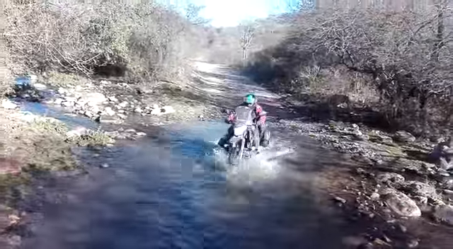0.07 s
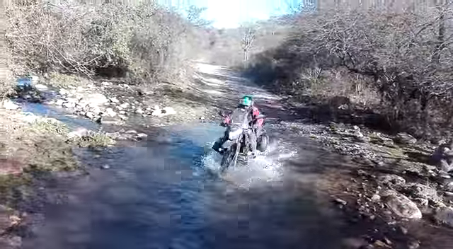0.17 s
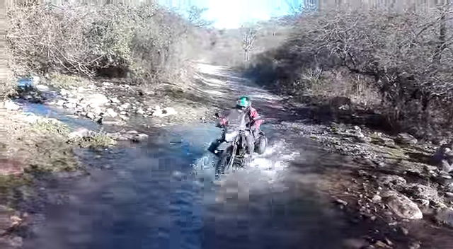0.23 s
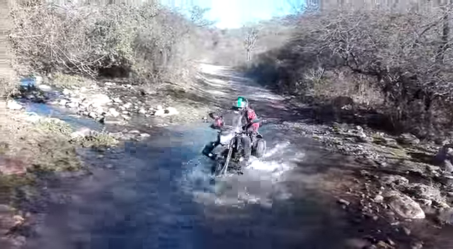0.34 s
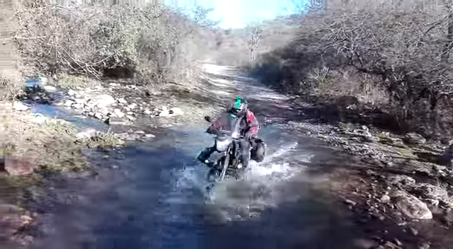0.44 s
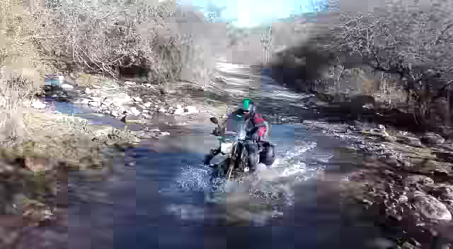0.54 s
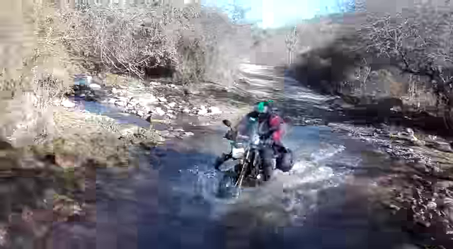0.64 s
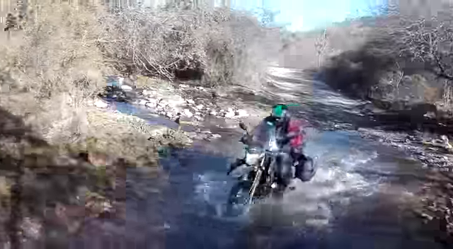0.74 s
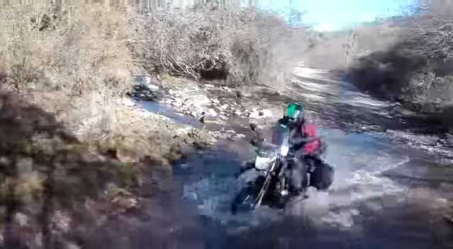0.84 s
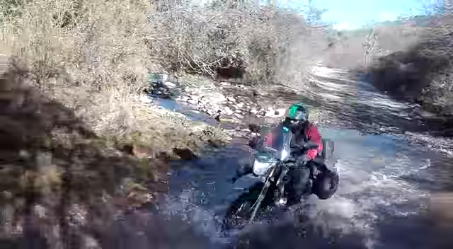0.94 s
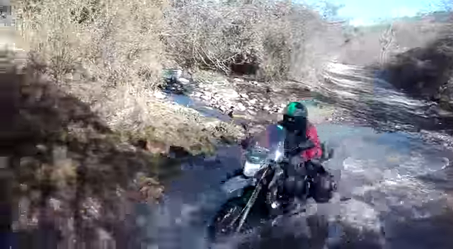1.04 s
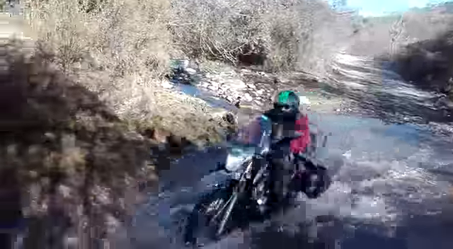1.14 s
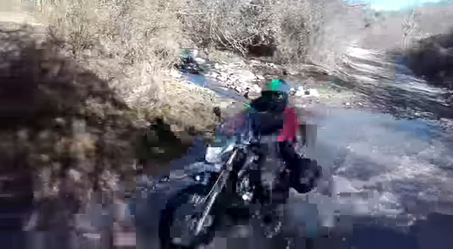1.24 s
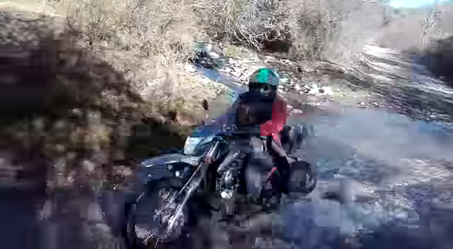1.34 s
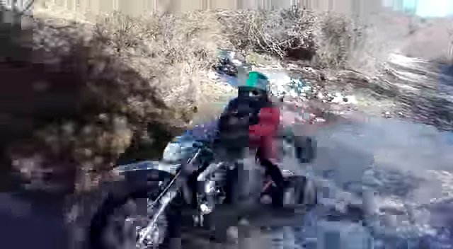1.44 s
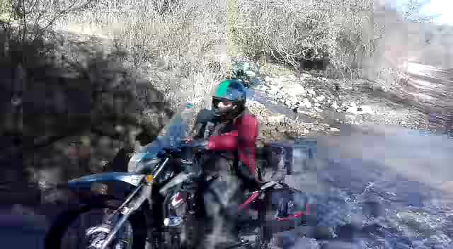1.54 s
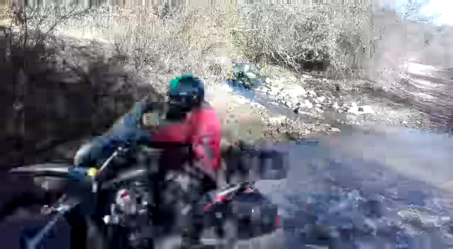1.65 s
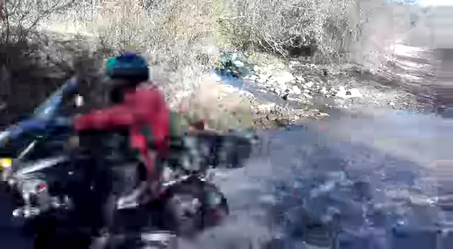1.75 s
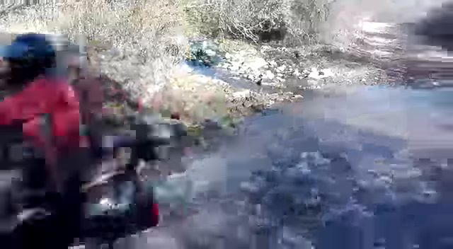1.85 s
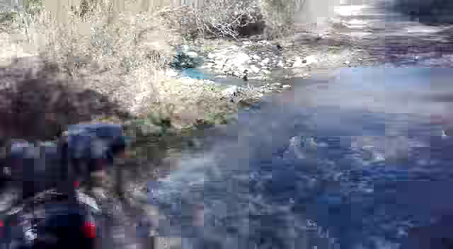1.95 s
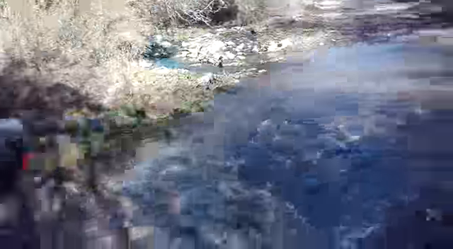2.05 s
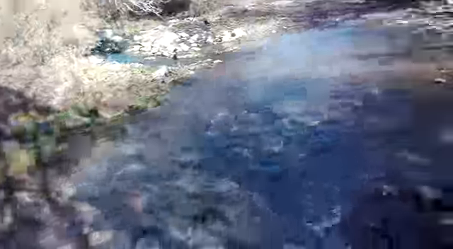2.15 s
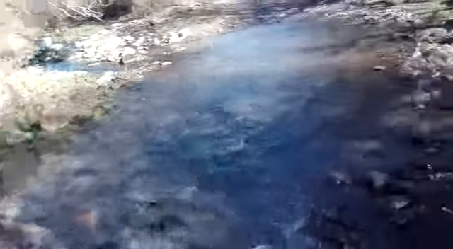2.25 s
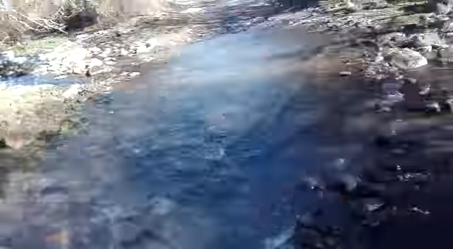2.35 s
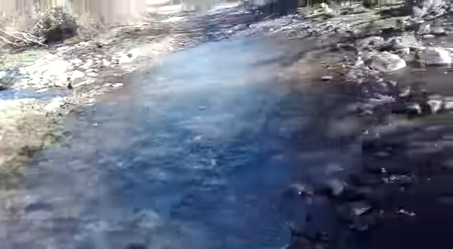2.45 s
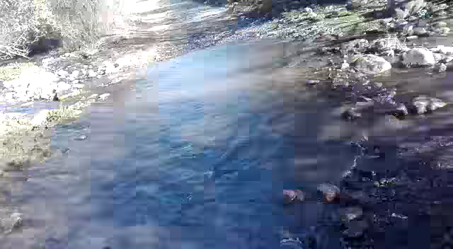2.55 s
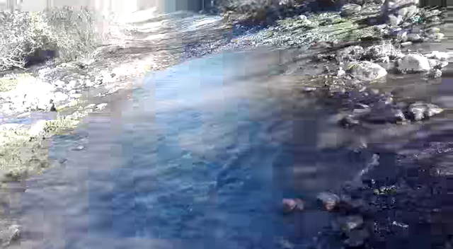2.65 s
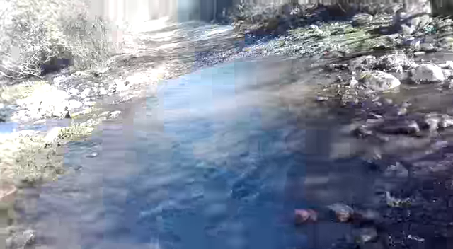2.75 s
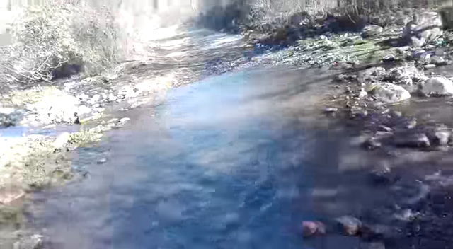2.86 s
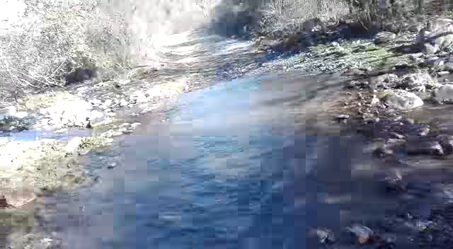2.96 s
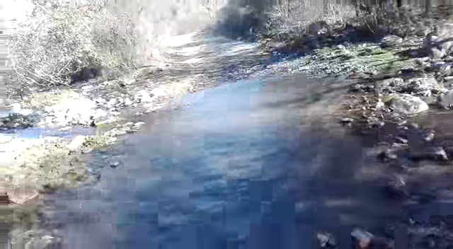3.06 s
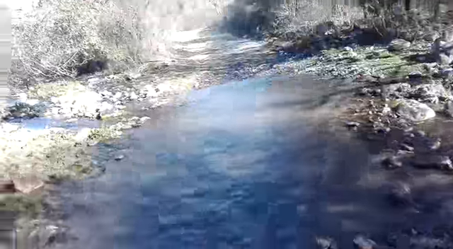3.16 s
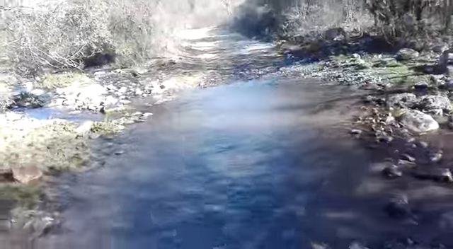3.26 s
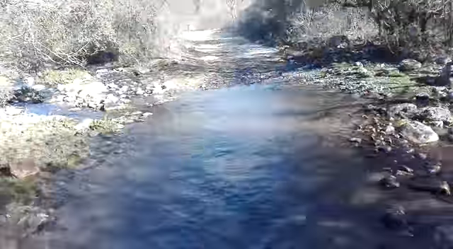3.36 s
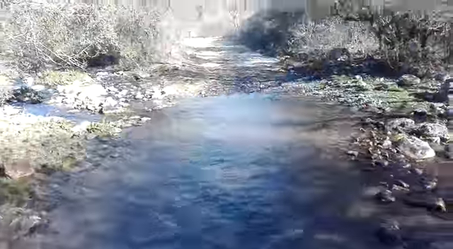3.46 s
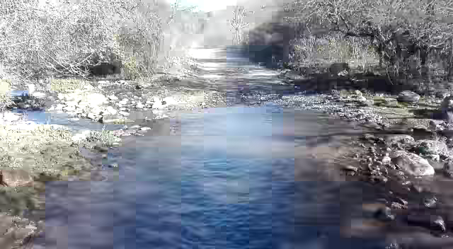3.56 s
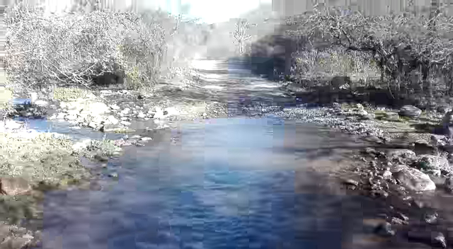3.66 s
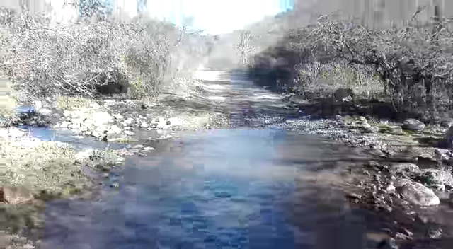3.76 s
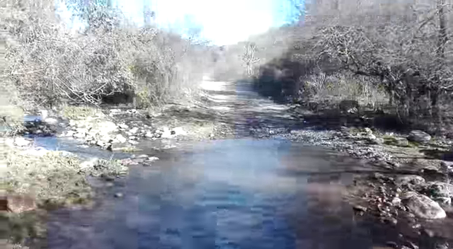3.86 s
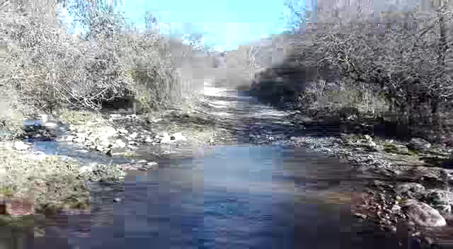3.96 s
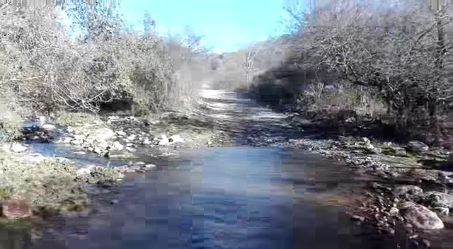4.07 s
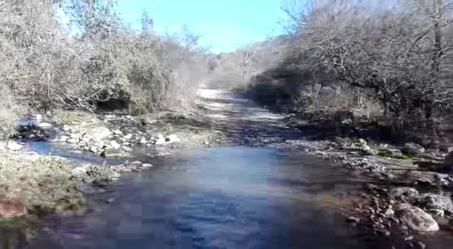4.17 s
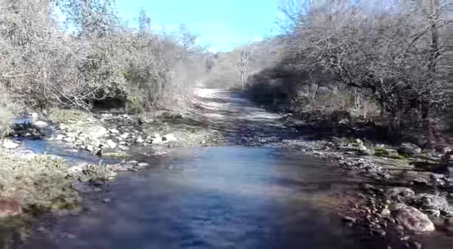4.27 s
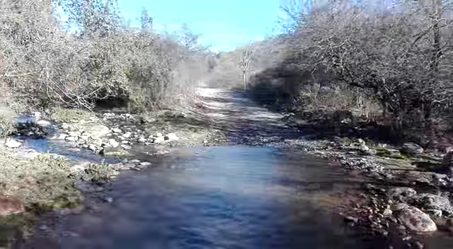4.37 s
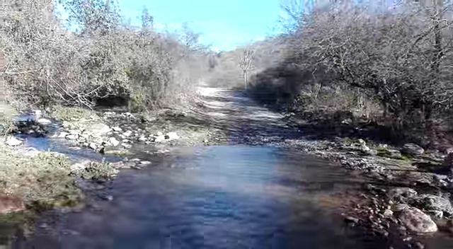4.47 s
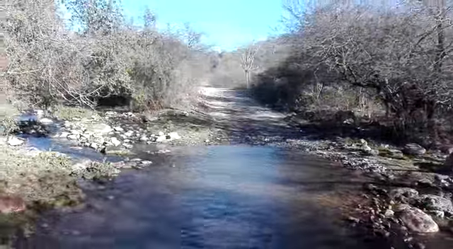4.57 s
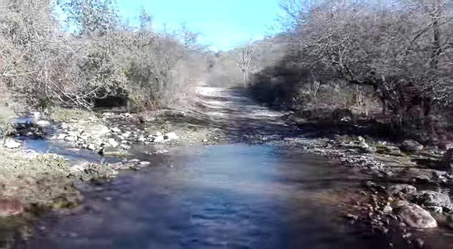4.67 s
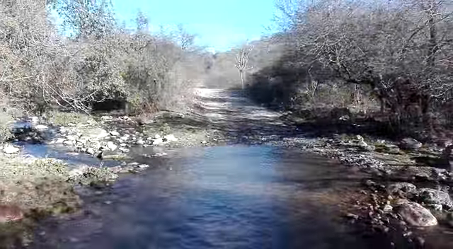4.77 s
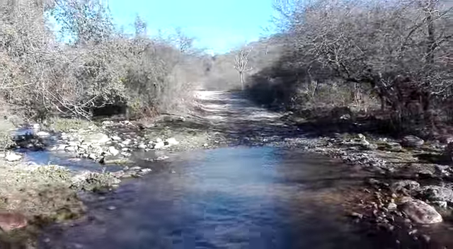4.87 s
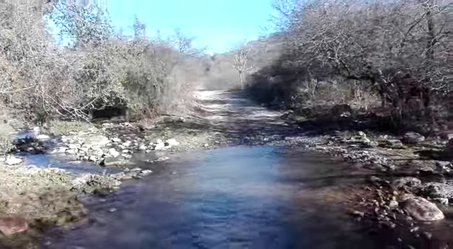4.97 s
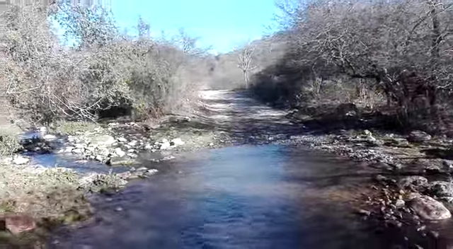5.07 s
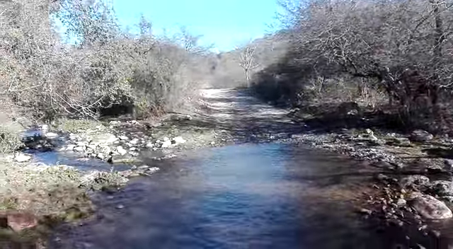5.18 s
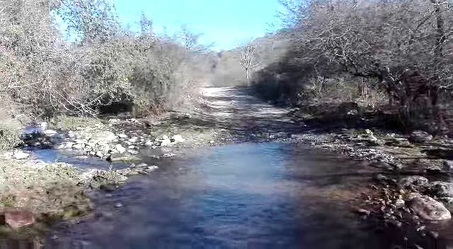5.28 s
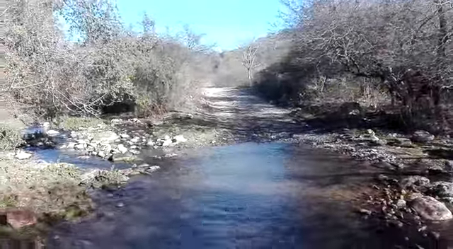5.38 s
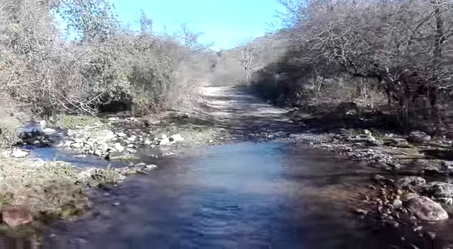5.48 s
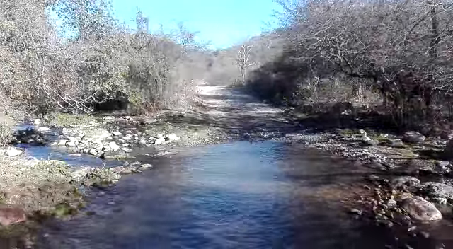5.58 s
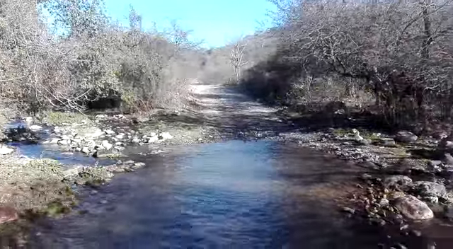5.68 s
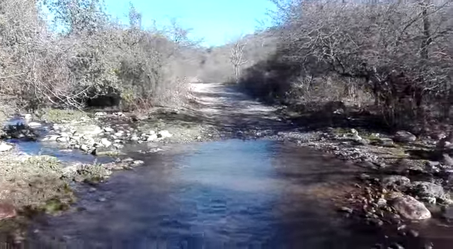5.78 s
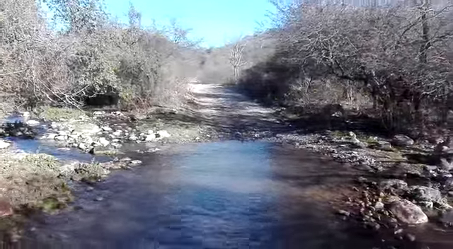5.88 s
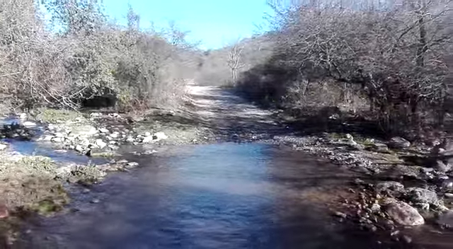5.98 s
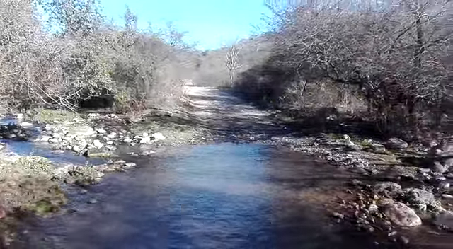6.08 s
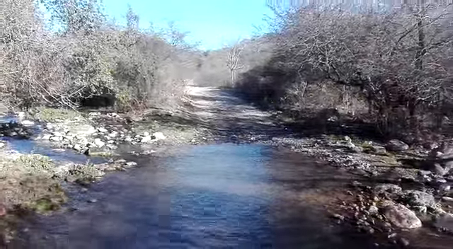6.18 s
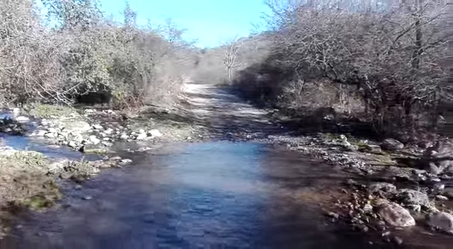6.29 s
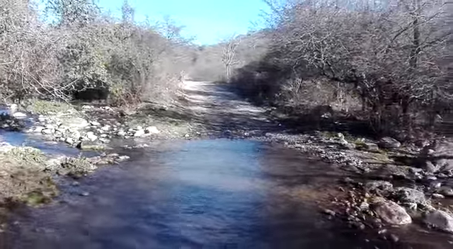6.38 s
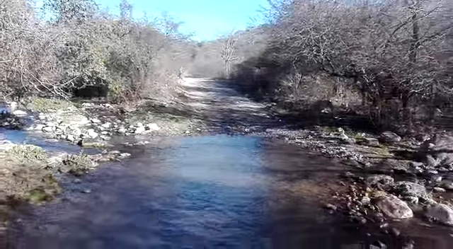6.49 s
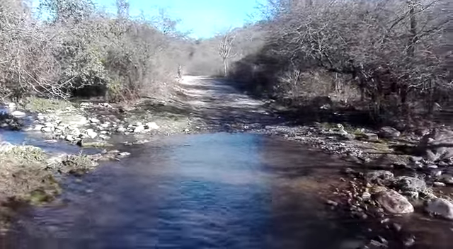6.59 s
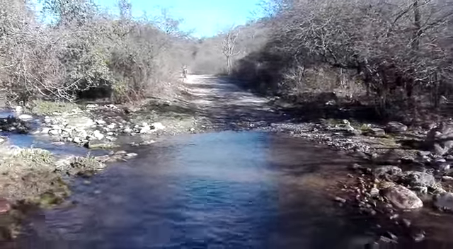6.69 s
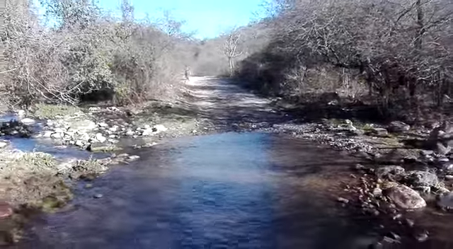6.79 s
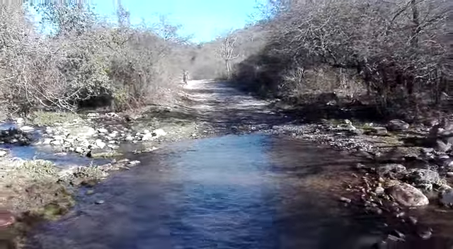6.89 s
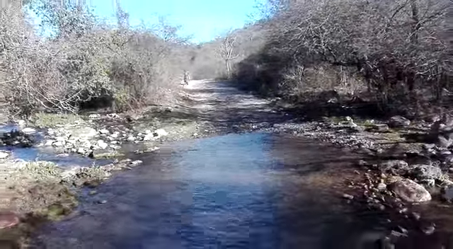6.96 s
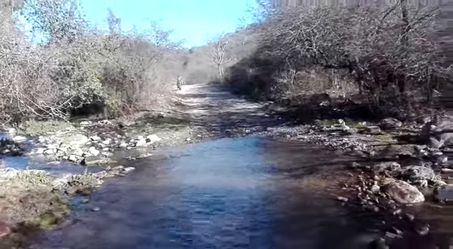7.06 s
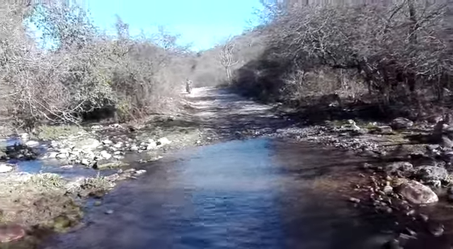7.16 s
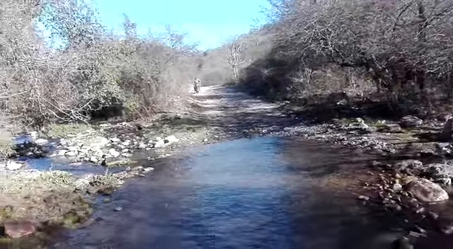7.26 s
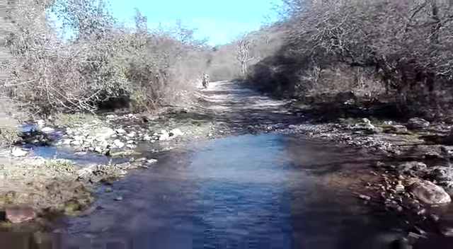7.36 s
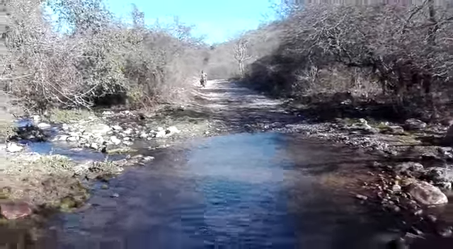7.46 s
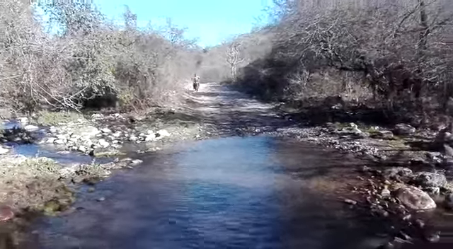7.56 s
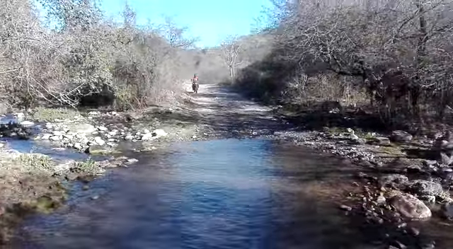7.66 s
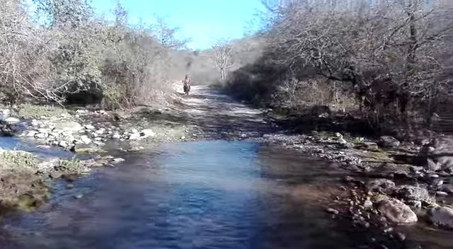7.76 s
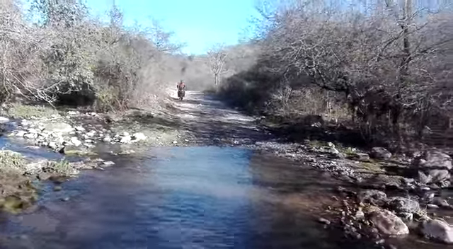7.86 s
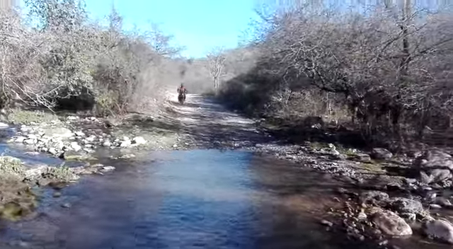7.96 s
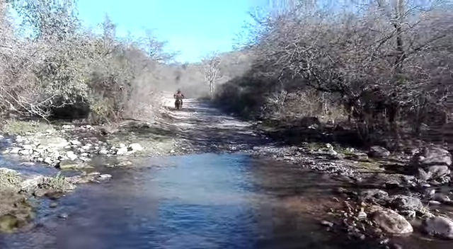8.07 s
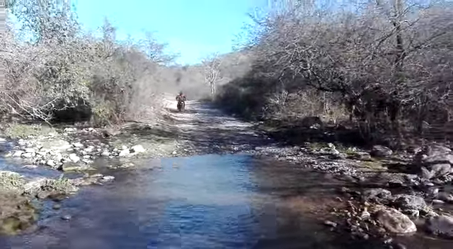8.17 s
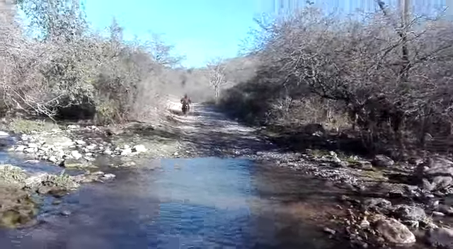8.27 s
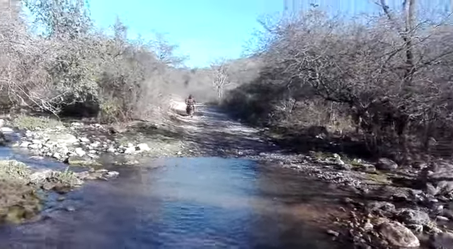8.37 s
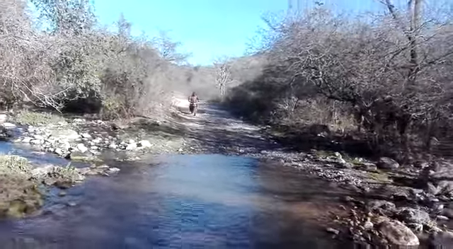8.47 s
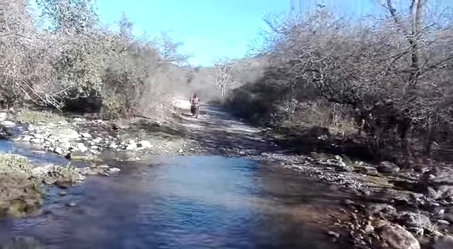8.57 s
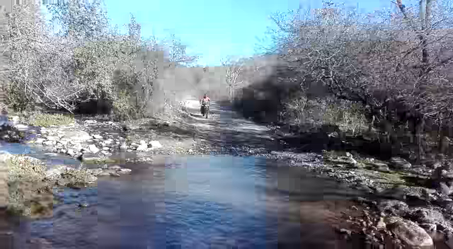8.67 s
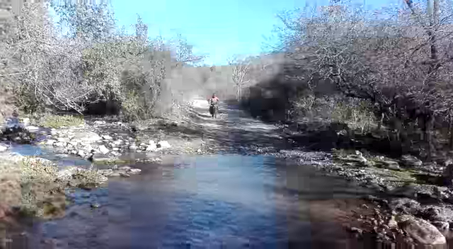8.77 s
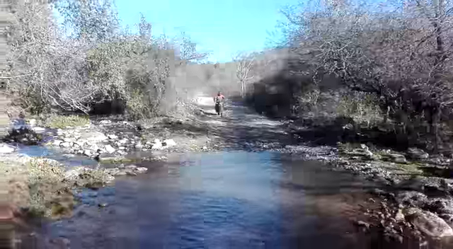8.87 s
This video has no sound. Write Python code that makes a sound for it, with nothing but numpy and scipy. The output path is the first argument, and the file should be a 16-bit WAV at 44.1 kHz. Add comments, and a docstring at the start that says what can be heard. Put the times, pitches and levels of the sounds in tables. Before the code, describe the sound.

At a shallow ford outdoors, heard close to the water, a bike that has just crossed thumps loudly and dully, falling to a slow idle by about 2.4 seconds. A single drip sounds near 0.1. Meanwhile a second single-cylinder bike approaches, its spray growing to a wide hissing burst around 1.6 as it revs and passes. Spray drops sharply after 2, and the raspy, barking exhaust dips and surges from 2.1 to 4.2, climbing the bank with a blurred tail from the trees. At about 4.2 the throttle closes; revs fall and irregular pops and small dry ticks continue to about 6.2, receding. From then on, soft uneven idling with missed beats sits over very faint stream water. After 6.5 a thin rasp of a third bike comes from far away, with tiny very high chirps from 7 to 8.5.

```python
"""Two single-cylinder trail bikes at a shallow ford, near the listener, over a trickling stream and one early drip.
One has crossed and slows to an uneven idle; the next ploughs through in a burst of spray, passes,
climbs the bank under throttle and draws off popping, while ticks begin. Late on, a third runs far up the track
and something small chirps very high. Each pipe is a set of decaying modes rung by every firing;
rasp, spray, stream and the blur from the banks are shaped noise."""
import sys
import numpy as np
from scipy import signal
from scipy.fft import rfft, irfft, next_fast_len
from scipy.io import wavfile
from scipy.ndimage import uniform_filter1d

SR = 44100
rng = np.random.default_rng(int(sys.argv[2]) if len(sys.argv) > 2 else 0)


def materialize(psi):
    """Save the field psi as 16-bit PCM at rate SR to the path in sys.argv[1].

    A 1-D psi becomes a single channel; in a 2-D psi each row is a channel.
    """
    bounded = np.clip(np.atleast_2d(psi).T, -1, 1)
    quanta = np.round(bounded * 32767).astype(np.int16)
    wavfile.write(sys.argv[1], SR, quanta)


N = 393813


def amp(db):
    """Decibel law: the amplitude gain of a level in dB."""
    return 10 ** (np.asarray(db) / 20)


def unit(x):
    """Normalisation: x at rms 1."""
    return x / np.sqrt(np.mean(x ** 2) + 1e-20)


def read(rows, s):
    """Linear interpolation: each column after the first, read at the times s."""
    t, *cols = np.transpose(rows)
    return [np.interp(s, t, c) for c in cols]


def along(points, hz):
    """Logarithmic pitch scale: (Hz, value) points interpolated on a log axis."""
    f, v = np.transpose(points)
    return np.interp(np.log(hz + 1), np.log(f + 1), v)


def filtered(x, response):
    """Linear filtering: the spectrum of x times a response of frequency."""
    padded = next_fast_len(N + 8192)
    spectrum = rfft(x, padded) * response(np.fft.rfftfreq(padded, 1 / SR))
    return irfft(spectrum, padded)[..., :N]


# Stereo spread of all noise: pitch_hz [Hz], side_minus_mid_db [dB]
SIDE_SPREAD = [(3500, -92.5), (4500, -30), (6000, -10), (8000, -4.5), (14000, -4)]


def rush(tone, patchy_db, drops=0, drop_db=0):
    """Turbulence: coloured noise of mid rms 1, with random patches and droplet clicks (drops per s)."""
    drop_sizes = (rng.random(N) < drops / SR) * rng.exponential(size=N)
    clicks = uniform_filter1d(drop_sizes, size=40) * 40  # each lasts 40 samples
    white = rng.standard_normal((2, N)) * (1 + amp(drop_db) * clicks)
    z = signal.stft(white, nperseg=512)[2]
    field = uniform_filter1d(rng.standard_normal(z.shape[1:]), size=8, axis=0)  # over frequency
    field = uniform_filter1d(field, size=10, axis=1)  # over time
    pair = signal.istft(z * amp(patchy_db * unit(field)), nperseg=512)[1][:, :N]
    # only the treble differs between the ears
    mid, side = filtered(pair, lambda hz: amp(along(tone, hz) + [0 * hz, along(SIDE_SPREAD, hz)]))
    return np.array([mid + side, mid - side]) / np.std(mid)


def firings(rate, lead):
    """Phase accumulation: times at which the summed rate passes a whole number, less lead (s)."""
    steps = 2000  # per s
    t = np.arange(rate[0][0], rate[-1][0], 1 / steps)
    turns = np.cumsum(read(rate, t)[0]) / steps
    return np.interp(np.arange(int(turns[-1]) + 1), turns, t) - lead


def laid(s, rows):
    """Superposition: one row of samples added at each time."""
    at = np.round(s * SR).astype(int)[:, None] + np.arange(rows.shape[1])
    # a margin of 1 s before and 2 s after takes the overhang
    return np.bincount(at.ravel() + SR, rows.ravel(), N + 3 * SR)[SR:SR + N]


# How unlike one firing is to the next: time_s [s], roughness [0-1]
FIRING_ROUGHNESS = [(0, .6), (1.2, .6), (1.5, .55), (2.05, .45), (2.15, .3), (2.45, .35), (2.6, .3),
                    (4.1, .28), (4.4, .4), (4.65, .9), (8.93, .9)]


def rung(s, db, modes, scatter_db, stretch=1):
    """Modal resonance: each firing pulls the air in first and rings the modes at new strengths and pitches."""
    t = np.arange(SR // 12) / SR
    rough, = read(FIRING_ROUGHNESS, s)
    rows = 0
    for hz, level_db, t60, attack in modes:
        chance = rough[:, None] * np.clip(rng.standard_normal((len(s), 2)), -1.5, 1.5)
        pitch = hz * stretch * (1 + .012 * chance[:, 0])
        strength = amp(db + scatter_db * chance[:, 1])
        fade = amp(level_db - 60 * t / t60) * (1 - np.exp(-t / attack))
        # the minus sign makes the first swing a pull
        rows = rows - strength[:, None] * fade * np.sin(2 * np.pi * pitch[:, None] * t)
    return laid(s, rows)


def marked(s, times, values):
    """Nearest-neighbour assignment: the values at the firings nearest to the times, 0 elsewhere."""
    out = np.zeros(len(s))
    out[np.abs(s[:, None] - np.asarray(times)).argmin(axis=0)] = values
    return out


# Echo from the banks as the bike draws off: time_s [s], level_under_direct_db [dB]
BANK_ECHO = [(0, -34), (2.4, -9.5), (4.1, -20), (4.5, -15), (8.93, -1)]


def scattered(x):
    """Diffuse reflection: the banks return the upper part of x as a short blurred tail."""
    decay_t60_s, lowest_hz = 0.39, 300
    t = np.arange(SR // 4) / SR
    tail = rng.standard_normal(len(t)) * amp(-60 * t / decay_t60_s) * (1 - np.exp(-t / 0.026))
    tail = tail / np.linalg.norm(tail)
    upper = filtered(x, lambda hz: hz ** 4 / (hz ** 4 + lowest_hz ** 4))
    level_db = read(BANK_ECHO, np.arange(N) / SR)[0]
    return amp(level_db) * signal.fftconvolve(upper, tail[None], axes=1)[:, :N]


# Level of the third bike: time_s [s], level_db [dB]
FAR_LEVEL = [(6, -79), (6.5, -65), (7.2, -59.5), (7.6, -77), (7.78, -57), (8.1, -62), (8.5, -62),
             (8.93, -70)]
# Its spectrum: pitch_hz [Hz], density_db [dB per Hz]
FAR_SPECTRUM = [(900, -40), (1300, 1), (1480, 2.5), (1800, -11), (2300, -23), (2750, -5), (3100, -2),
                (3500, -16), (5000, -45)]


def far_bike():
    """Band-limited noise: only two thin bands of rasp reach the ford from far up the track."""
    level_db = read(FAR_LEVEL, np.arange(N) / SR)[0]
    return amp(level_db) * rush(FAR_SPECTRUM, patchy_db=2.0, drops=60, drop_db=-6)


# Spectrum of the low blur: pitch_hz [Hz], density_db [dB per Hz]
RUMBLE_SPECTRUM = [(12, -70), (25, -40), (54, -9), (75, 0), (110, -2), (150, -8), (200, -17), (300, -23),
                   (372, -40), (650, -56), (1100, -120)]


def banks():
    """Diffuse reflection: the banks return a low blur of the engines, thinner under load and in even running."""
    lag_s, loaded_db, gain_db, floor_db = 0.25, -9, -7, -41
    t = np.arange(N) / SR
    level_db, load, _ = read(THROTTLE, t - lag_s)
    thump_db = read(WAITING_PIPE, t - lag_s)[0]
    passing = read(FIRING_ROUGHNESS, t)[0] * amp(level_db + loaded_db * load)
    engines = passing + amp(thump_db - 12)
    return (amp(gain_db) * engines + amp(floor_db)) * rush(RUMBLE_SPECTRUM, patchy_db=-0.5)


# Levels of the wheel spray, before its surges, and of the stream: time_s [s], level_db [dB]
SPRAY_LEVEL = [(0.0, -40.5), (0.5, -33.5), (0.98, -31), (1.3, -27), (1.42, -26), (1.52, -24.5),
               (1.64, -23.5), (1.78, -24), (1.9, -26), (2.06, -37), (2.36, -40), (2.8, -43.5), (3.2, -57),
               (4.1, -53), (4.6, -86), (5.3, -75)]
STREAM_LEVEL = [(0, -35.5), (1, -33.5), (1.45, -28.5), (1.65, -23.5), (1.85, -28), (2.2, -27), (2.5, -37.5),
                (3.2, -41), (4.05, -42), (4.65, -52), (5.2, -54), (7.1, -53.5), (7.6, -54), (7.8, -52),
                (8.4, -53), (8.93, -54)]
# Their spectra: pitch_hz [Hz], density_db [dB per Hz]
SPRAY_SPECTRUM = [(180, -27), (300, -12), (358, 7), (442, -31), (685, -23), (947, -21), (1370, -10.5),
                  (1670, -5.5), (2420, -8.5), (3240, -4), (6300, -13.5), (13000, -8.5), (14400, -15.5)]
STREAM_SPECTRUM = [(300, -41), (420, -4), (591, -8), (774, -6), (954, -7), (1790, -6.5), (2380, -12),
                   (3120, -11), (4080, -14), (8260, -23.5), (12800, -20.5), (14400, -23.5)]


def water():
    """Turbulent noise with droplet impacts: wheel spray over the churn and trickle of the ford."""
    surge_rms_db, surge_s = 1, 0.03
    t = np.arange(N) / SR
    span = int(surge_s * SR)
    surge = uniform_filter1d(uniform_filter1d(rng.standard_normal(N), span), span)
    spray_db = read(SPRAY_LEVEL, t)[0] + surge_rms_db * unit(surge)
    spray = amp(spray_db) * rush(SPRAY_SPECTRUM, patchy_db=2, drops=500, drop_db=-9)
    stream = amp(read(STREAM_LEVEL, t)[0]) * rush(STREAM_SPECTRUM, patchy_db=1.8, drops=160, drop_db=-9)
    return spray + stream


# Broad ticks: start_s [s], envelope_peak_db [dB], before the treble filter
TICK_EVENTS = [(4.537, -43), (4.596, -32.5), (4.614, -39.5), (4.898, -43), (5.584, -37), (5.6115, -42),
               (6.0202, -44), (6.5859, -46), (6.977, -44), (7.7136, -44)]
# High chirps, and the drip: start_s [s], level_db [dB], pitch_hz [Hz] at the start, t60_s [s]
CHIRP_EVENTS = [(7.046, -55, 7000, 0.11), (7.847, -46, 12300, 0.21), (8.143, -54, 12200, 0.13),
                (8.17, -54, 6800, 0.11), (8.262, -53, 8900, 0.17), (8.44, -46, 12200, .2)]
DRIP_EVENT = [(.134, -14.5, 1940, 0.022)]


def small_sounds():
    """Exponential decay: noise ticks, and fluttering sine tones for the breathy chirps and one drip."""
    tick_t60_s, tick_hz = 0.082, 1300  # ticks are thin below tick_hz
    t = np.arange(SR // 6) / SR
    s, db = np.transpose(TICK_EVENTS)
    ticks = laid(s, amp(db[:, None] - 60 * t / tick_t60_s)) * rush(RASP_SPECTRUM, patchy_db=1.5)
    ticks = filtered(ticks, lambda hz: hz ** 2 / (hz ** 2 + tick_hz ** 2))
    s, db, hz, t60 = np.transpose(CHIRP_EVENTS + DRIP_EVENT)[:, :, None]
    # the pitch sags a little and flutters at random
    flutter = unit(uniform_filter1d(rng.standard_normal((len(s), len(t))), size=30, axis=1))
    pitch = hz * (1 + 0.016 * flutter - .3 * t)
    fade = amp(db - 60 * t / t60) * (1 - np.exp(-t / 0.001))
    tones = np.sin(2 * np.pi * np.cumsum(pitch, axis=1) / SR) * fade
    return ticks + laid(s[:, 0], tones)


RING_LOWEST = 0.834  # lowest share of the ring's listed pitches
# Engine speed of the waiting bike, starting on a firing: time_s [s], rate [firings per s]
WAITING_SPEED = [(0, 36.2), (.45, 33.06), (.7, 32.12), (1, 30.01), (1.2, 28.87), (2.4, 17.04), (4.6, 17.66),
                 (5.4, 17.92), (6, 17.76), (6.65, 17.55), (8.05, 17.68), (8.93, 17.43)]
# Its muffled pipe, before mode levels and scatter: time_s [s], thump_db [dB], ring_db [dB], throat_db [dB]
WAITING_PIPE = [(0, -2.5, -18, -29), (.47, -6, -25, -31), (.53, -11.5, -36, -19), (.76, -14, -30, -20),
                (.85, -8.5, -23, -30), (1.2, -10, -32, -39), (1.26, -13, -35, -26), (1.6, -10, -33, -30),
                (2.4, -16, -36, -21), (4.5, -21.5, -31, -44), (5.4, -25.5, -19.5, -34.5),
                (6.5, -23, -24.5, -35.5), (8.93, -25.5, -24.5, -42)]
# Firings weaker or stronger than usual, some only slightly: time_s [s], change_db [dB]
UNEVEN_FIRINGS = [(.084, -5), (.172, -1.5), (.316, -0.5), (.408, -1), (.438, 3), (.468, 1), (.527, -7),
                  (.677, -4), (.708, -1.5), (.774, 1.5), (.838, 4), (.872, -4), (.935, 3), (1.035, 2),
                  (1.1, -3), (1.207, 3.5), (5.4, -9), (6.08, -3), (6.31, -18), (6.417, -31), (6.474, 4),
                  (6.53, -16), (6.7, -15), (6.755, 4.5), (6.812, -31), (7.155, 1.5), (7.388, -24),
                  (8.065, -1), (8.174, -2), (8.288, -6), (8.519, 1.5), (8.86, -2)]
# Modes of the dull thump: pitch_hz [Hz], level_db [dB], t60_s [s], attack_s [s]
THUMP_MODES = [(79, -9.5, 0.079, 0.012), (107, -3, 0.027, 0.0083), (127.2, 7, 0.044, 0.0057),
               (216.3, 2, 0.029, 0.0086), (278, -19.5, 0.066, 0.0067), (317, -24, 0.066, 0.0051),
               (443, -31, 0.021, 0.0039)]


def waiting():
    """Impulse-driven resonance: the bike that has crossed thumps dully, slowing to an idle that misses firings."""
    jitter_s, scatter_db = .0006, 1.2
    s = firings(WAITING_SPEED, lead=0.00376)
    s = s + jitter_s * rng.standard_normal(len(s))
    uneven = scatter_db * np.clip(rng.standard_normal(len(s)), -2, 1.5)
    uneven = uneven + marked(s, *np.transpose(UNEVEN_FIRINGS))
    thump_db, ring_db, throat_db = read(WAITING_PIPE, s) + uneven
    tone = rung(s, thump_db, THUMP_MODES, scatter_db=2.5)
    tone += rung(s, ring_db, RING_MODES, scatter_db=2.5, stretch=RING_LOWEST)
    tone += rung(s, throat_db, BODY_MODES + THROAT_MODES, scatter_db=3.5, stretch=0.81)
    return tone[None] + scattered(tone[None])


# Engine speed of the passing bike, starting on a firing: time_s [s], rate [firings per s]
ENGINE_SPEED = [(0.0, 35.57), (0.45, 32.7), (0.55, 34.48), (0.65, 30.68), (1.0, 36.58), (1.1, 33.6),
                (1.45, 36.39), (1.52, 41.5), (1.6, 45.5), (1.69, 45.5), (1.74, 35), (1.8, 33.14),
                (1.9, 32.7), (2.0, 40), (2.1, 43), (2.15, 41.26), (2.25, 36.29), (2.5, 30.93), (2.6, 34.02),
                (2.7, 38.86), (2.95, 29.17), (3.1, 27.81), (3.2, 28.5), (3.4, 30.76), (3.75, 35.23),
                (3.9, 36.38), (4.12, 38.7), (4.2, 35.38), (4.7, 19.52), (5.0, 23.73), (5.1, 19.95),
                (5.6, 16.71), (5.75, 20.17), (6.65, 17.41), (8.05, 17.75), (8.93, 17.34)]
# The rider and the pipe: time_s [s], exhaust_level_db [dB], load [0-1], bark_hz [Hz]
THROTTLE = [(0, -31, 0.6, 736), (.53, -36, 0.67, 744), (.74, -26, 0.81, 760), (.85, -20.5, 0.8, 730),
            (1.2, -25, 0.95, 725), (1.5, -16.5, 0.82, 724), (1.65, -16, 0.66, 640), (2.03, -17, 0.87, 728),
            (2.12, -13.5, 0.51, 724), (2.36, -12, 0.23, 715), (2.44, -17.5, 0.59, 620),
            (2.52, -13.5, 0.76, 706), (2.75, -15.5, 0.86, 690), (2.95, -18, 0.93, 710),
            (3.2, -15.5, 0.72, 732), (3.5, -20.5, 0.97, 743), (3.8, -18.5, .9, 800),
            (4.12, -18.5, 0.86, 867), (4.21, -19, 0.2, 855), (4.52, -23.5, 0.07, 900),
            (4.7, -31.5, 0.42, 810), (5, -25.5, 0.14, 650), (5.4, -38, 0.37, 695), (5.8, -31.5, 0, 706),
            (6.2, -40, 0.12, 730), (6.5, -47.5, 0.15, 800), (8.93, -41, 0.75, 800)]
# Level of each part of the exhaust sound over time, added to its voice:
# time_s [s], body_db [dB], throat_db [dB], bark_db [dB], rasp_db [dB]
PIPE_PART_LEVELS = [(0, -2, 5, -2, -5), (.75, 7, 1, -4.5, -5), (1.0, -4.5, -9, -4.5, 1),
                    (1.3, 0.5, -7, -0.5, -4), (1.6, -7, -11, 1.5, -18), (1.75, 4.5, 5.5, 3.5, -11),
                    (1.9, 1, 3, 3, -17), (2.05, -6, 1.5, 4, -5), (2.12, -11, -2, -10, -18),
                    (2.3, 9, -13, 5.5, -1), (2.5, 1, -0.5, -0.5, -2), (2.75, -1.5, -1.5, -1, 1),
                    (2.95, 4, 5, -5.5, 2.5), (3.2, 7.5, 2.5, -0.5, 2.5), (3.6, -3.5, 2, 2.5, 4),
                    (4.1, -3.5, 1.5, 2.5, 1), (4.3, 8, 8, 15, 4.5), (4.8, -15, 10, -5, -0.5),
                    (5.5, 9, 0.5, 9, -4.5), (8.93, 10, 13, -1, 6)]
# Pipe modes before any stretch: pitch_hz [Hz], level_db [dB], t60_s [s], attack_s [s]
BOOM_MODES = [(35.8, -26, 0.013, .002), (75.8, 0.5, 0.077, 0.0017)]
RING_MODES = [(113.3, 3.5, 0.099, 0.0053), (177, 2.5, 0.016, 0.00061)]
BODY_MODES = [(112, -5.5, 0.03, 0.0085), (143.8, 2.5, 0.068, 0.0097), (181, 0.5, 0.13, 0.01),
              (213, 1, 0.1, 0.016)]
THROAT_MODES = [(271, -5, 0.098, 0.027), (300.9, 5, 0.061, 0.01), (332.6, 4, 0.062, 0.0099),
                (361.5, -5.5, 0.11, 0.02), (440, -5, 0.071, 0.013)]
# Bark, the lower note under it, and pops: pitch [times bark_hz], level_db [dB], t60_s [s], attack_s [s]
BARK_MODES = [(0.92, 3, 0.024, 0.0045), (1.02, 4, 0.024, 0.0041), (1.15, -14.5, 0.024, 0.0053),
              (1.35, -22, 0.012, 0.004), (2.05, -26, 0.07, .0012)]
HOLLOW_MODES = [(.68, 2, 0.029, 0.0081)]
POP_BARK_MODES = [(.8, 2.5, 0.022, 0.0024), (1, 9.5, 0.019, 0.0025), (1.2, -4, .035, .002),
                  (2.1, -12, .03, 0.0026)]
# Level of the lower note: time_s [s], level_over_bark_db [dB]
HOLLOW_LEVEL = [(0, -22), (1.2, -5.5), (1.9, -5.5), (2.5, -10), (3.1, -8), (3.3, -40), (4.2, -38),
                (4.6, -12), (8.93, -12)]
# Hard firings at low speed: start_s [s], bark_db [dB] before mode levels, bark_hz [Hz]
HARD_FIRINGS = [(4.419, -28, 910), (4.497, -39, 830), (4.535, -37, 1240), (4.621, -34, 980),
                (4.667, -42, 905), (4.862, -37, 700), (4.892, -34, 1155), (4.948, -40, 700),
                (4.995, -33, 630), (5.037, -32, 620), (5.083, -39, 620), (5.185, -36, 710),
                (5.355, -43, 600), (5.622, -41, 810), (5.686, -32.5, 710), (5.739, -32.5, 690),
                (5.838, -34, 690), (5.886, -33.5, 636), (6.041, -37.5, 715), (6.147, -39, 790),
                (6.204, -34.5, 880)]
# Gaps between throat and bark: pitch_hz [Hz], width_hz [Hz], depth_db [dB]
SPECTRAL_GAPS = [(413, 49, -10.5), (522, 46, -9)]
# Spectrum of the rasp: pitch_hz [Hz], density_db [dB per Hz]
RASP_SPECTRUM = [(650, -2.5), (1100, 8), (1270, -0.5), (1500, -0.5), (1860, -1.5), (2240, -7), (2990, -5),
                 (7790, -18.5), (12600, -16), (14400, -28)]


def bike():
    """Source-filter principle: load drives boom, body, bark and rasp; a closed throttle leaves the pipe ringing."""
    s = firings(ENGINE_SPEED, lead=0.00385)
    rate = read(ENGINE_SPEED, s)[0]
    level_db, load, bark_hz = read(THROTTLE, s)
    slack = 1 - np.clip(load, 0, 1)
    # slow running fires unevenly
    slowness = np.clip(np.gradient(s) * 100 - 2.5, .4, 1.2)
    uneven = slowness * np.clip(rng.standard_normal(len(s)), -2, 1.5) * read(FIRING_ROUGHNESS, s)[0]

    def voice(full_db, lost_db):
        """Load dependence: dB over the exhaust level at full load, less dB lost on a closed throttle."""
        return level_db + uneven + full_db - lost_db * slack

    boom_db, ring_db, body_db = voice(12.5, 19.5), voice(-3.5, -15), voice(5.5, 28.5)
    body_trim, throat_trim, bark_trim, rasp_trim = read(PIPE_PART_LEVELS, s)
    bark_db, rasp_db = voice(9.5, 32) + bark_trim, voice(-5, 16.5) + rasp_trim

    pop_s, pop_db, pop_hz = np.transpose(HARD_FIRINGS)
    pop = marked(s, pop_s, amp(pop_db))

    def with_pops(db, gain_db):
        """Amplitude addition: the level in dB with the hard firings added."""
        return 20 * np.log10(amp(db) + amp(gain_db) * pop)

    # boom, body and throat follow a power of the firing rate that falls to 0 on a closed throttle
    stretch = (rate / 36.95) ** (0.94 * (1 - slack))
    ring_stretch = np.maximum(rate / 36.9, RING_LOWEST)
    tone = rung(s, ring_db, RING_MODES, scatter_db=3.5, stretch=ring_stretch)
    tone += rung(s, boom_db, BOOM_MODES, scatter_db=3.3, stretch=stretch)
    tone += rung(s, body_db + body_trim, BODY_MODES, scatter_db=3.5, stretch=stretch)
    throat_db = with_pops(body_db + throat_trim, gain_db=-7.0)
    tone += rung(s, throat_db, THROAT_MODES, scatter_db=5.5, stretch=stretch)
    bark_s = s + 0.00134  # the bark follows the first pull of air
    tone += rung(bark_s, bark_db, BARK_MODES, scatter_db=3.5, stretch=bark_hz)
    tone = filtered(tone, lambda hz: amp(sum(db * np.exp(-((hz - mid) / width) ** 2)
                                             for mid, width, db in SPECTRAL_GAPS)))
    hollow_db = bark_db + read(HOLLOW_LEVEL, s)[0]
    tone += rung(bark_s, hollow_db, HOLLOW_MODES, scatter_db=4, stretch=bark_hz)
    tone += rung(pop_s, pop_db, POP_BARK_MODES, scatter_db=3.0, stretch=pop_hz)

    # each puff of rasp: a short burst over a faint longer tail
    t = np.arange(SR // 16) / SR
    puff = amp(-60 * t / 0.028) * (1 - np.exp(-t / 0.0012)) + 0.05 * amp(-60 * t / 0.15)
    puffs = laid(s + 0.0024, amp(with_pops(rasp_db, gain_db=-9))[:, None] * puff)
    direct = tone + puffs * rush(RASP_SPECTRUM, patchy_db=.8)
    return direct + scattered(direct)


def scene():
    """Superposition: everything at the ford, summed."""
    return far_bike() + banks() + water() + small_sounds() + waiting() + bike()


def record(dry):
    """Band limitation: a second-order high-pass trims the deepest bass, and nothing passes above the top."""
    corner_hz, top_hz = 31, 14420

    def response(hz):
        """Second-order resonator response: high-pass below a sharp upper limit."""
        ratio = hz / corner_hz
        return (hz < top_hz) * (1j * ratio) ** 2 / (1 + 1.4j * ratio - ratio ** 2)

    return filtered(dry, response)


dry = scene()
out = record(dry)
materialize(out)
```